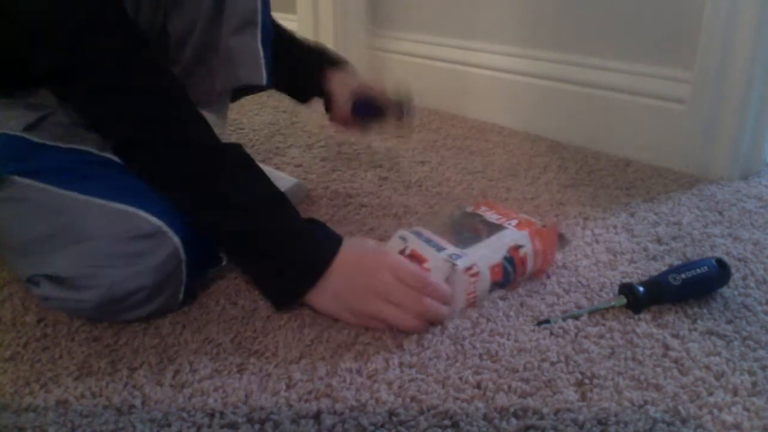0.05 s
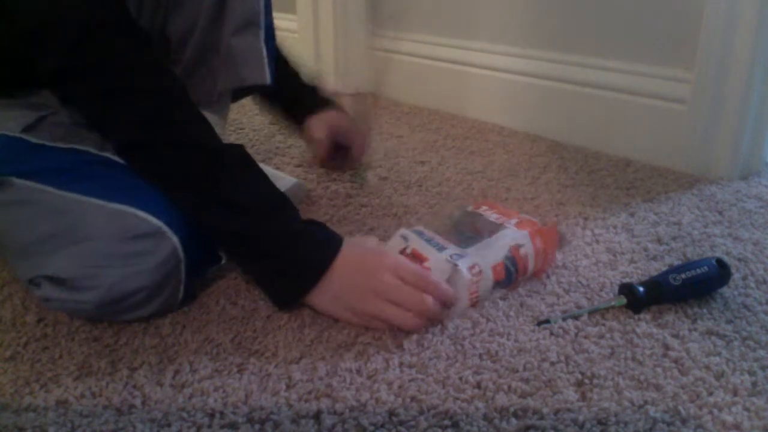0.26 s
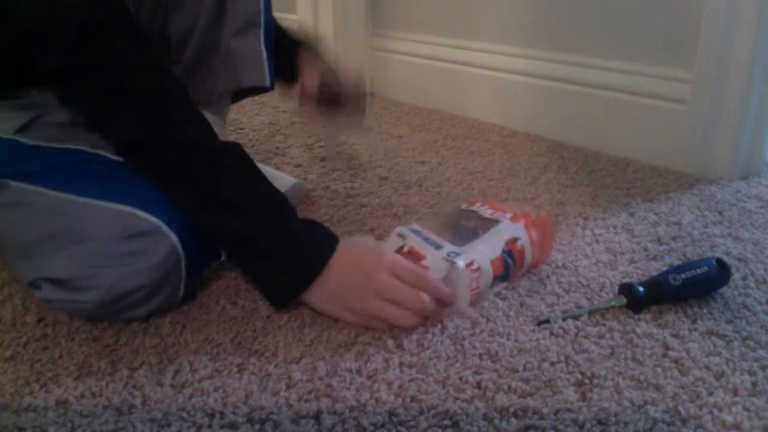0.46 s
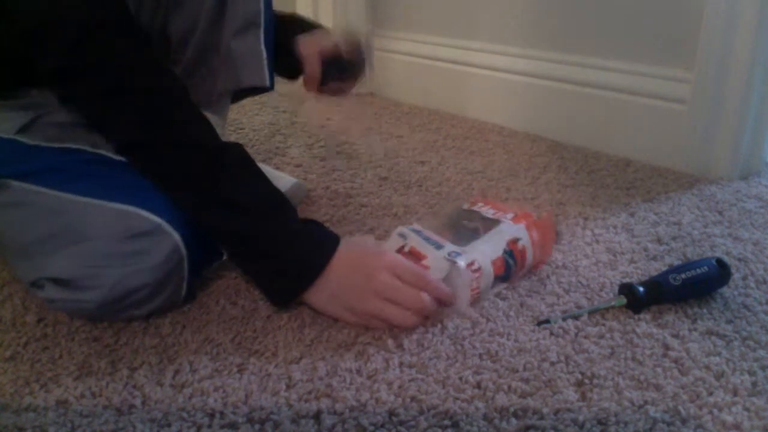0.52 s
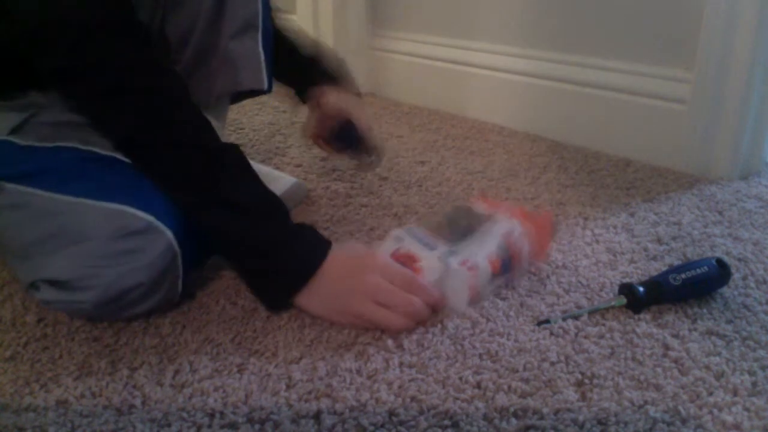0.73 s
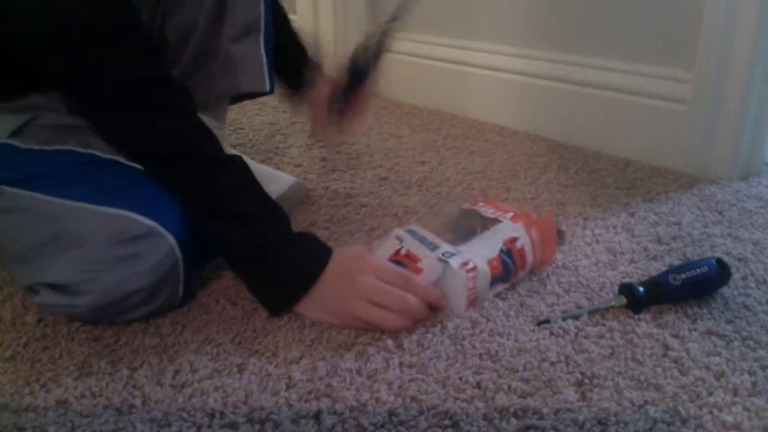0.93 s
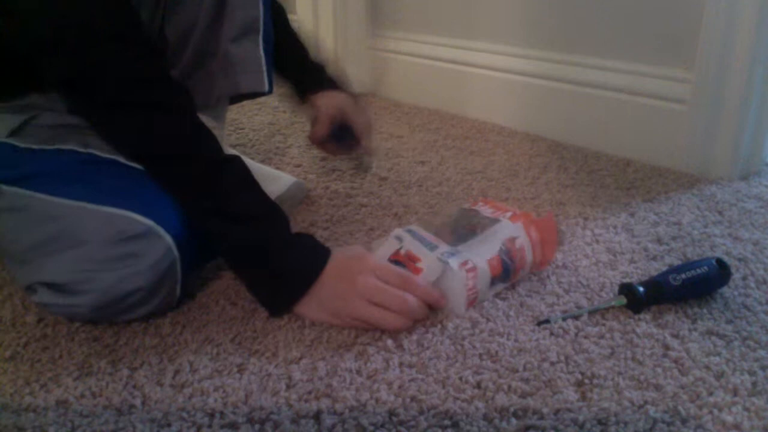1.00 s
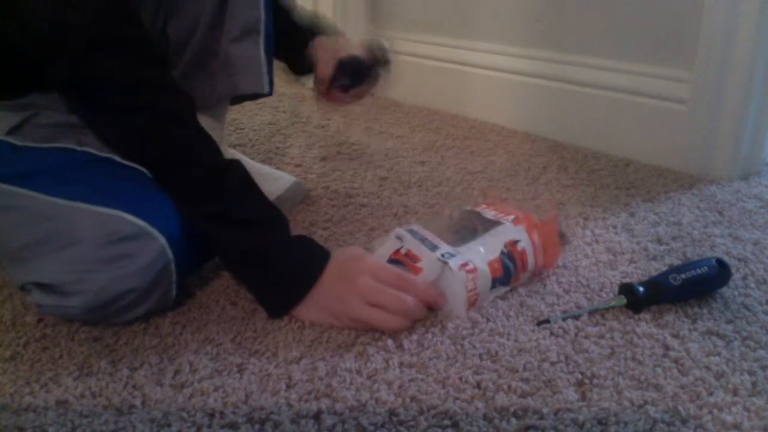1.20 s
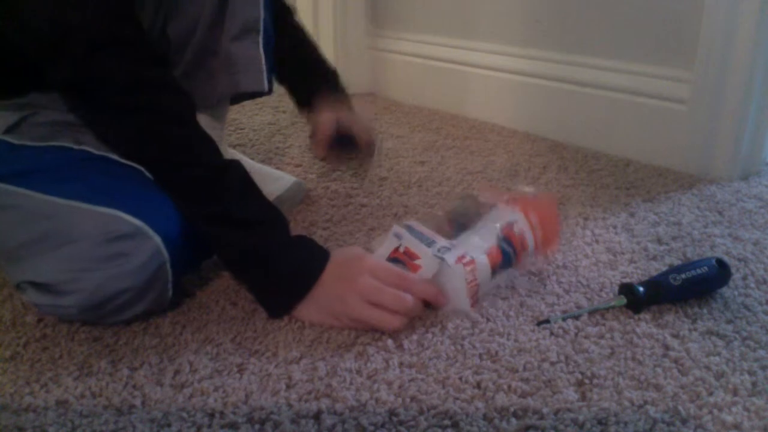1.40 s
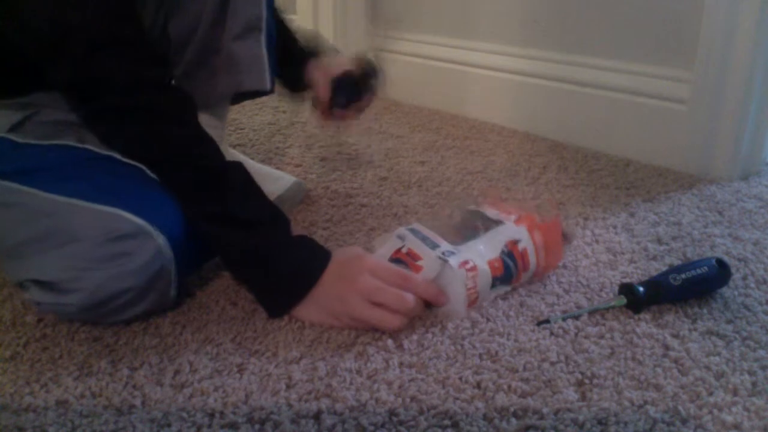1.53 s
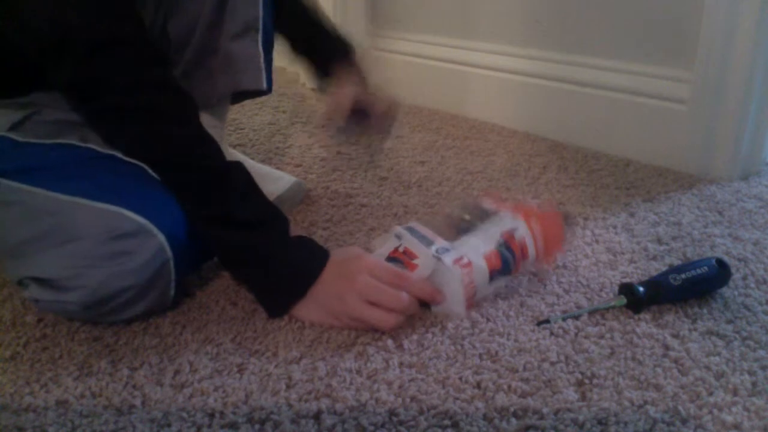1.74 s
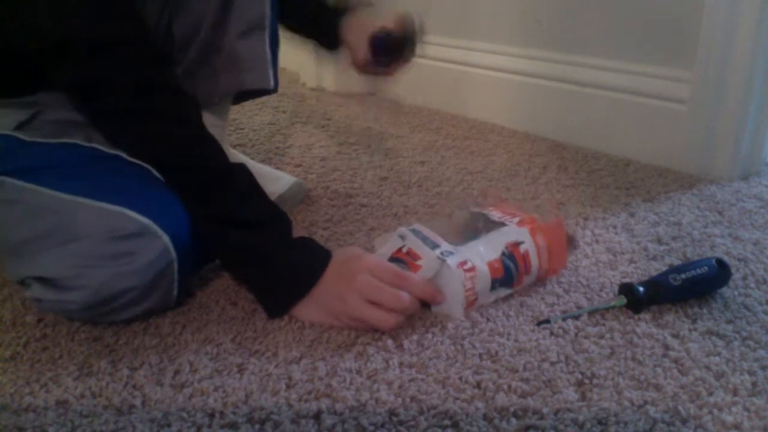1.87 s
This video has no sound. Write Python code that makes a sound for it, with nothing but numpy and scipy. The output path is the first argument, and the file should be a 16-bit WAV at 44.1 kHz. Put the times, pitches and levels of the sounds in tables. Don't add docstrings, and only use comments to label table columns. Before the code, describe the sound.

Five loud hollow whacks on a small windowed box, plastic crackling and popping back between blows

```python
import sys
import numpy as np
from scipy import signal
from scipy.io import wavfile
from scipy.ndimage import uniform_filter1d

SR = 44100
rng = np.random.default_rng(int(sys.argv[2]) if len(sys.argv) > 2 else 0)


def amplitude_ratio(level_db):
    exponent = np.asarray(level_db, float) / 20
    return 10 ** exponent


def store_pcm(level_fs):
    pcm = np.round(np.clip(level_fs, -1, 1) * 32767).astype(np.int16)
    wavfile.write(sys.argv[1], SR, np.atleast_2d(pcm).T)


N = 85995

# [f/Hz, level/dB per Hz]
AIR_COLOUR = [(25, -9), (65, 1), (130, -7), (320, -12), (420, -31.5), (1400, -8), (2600, -24.5),
              (15000, -42)]
# [f/Hz, level/dB]
BLOW_TAIL_COLOUR = [(200, -11.5), (330, -18.5), (650, -23.5), (1200, -9), (2000, -9), (2700, -18.5),
                    (5000, -16), (15000, -33)]
# [f/Hz, level/dB]
POP_TAIL_COLOUR = [(200, -19), (700, -42), (1700, -8.5), (2500, -16), (4600, -12), (7800, -15), (9500, -67),
                   (15000, -44)]
# [f/Hz, t60/s]
TAIL_T60 = [(150, 0.26), (700, 0.38), (1500, 0.27), (4000, 0.26), (8000, 0.31), (12000, 0.14), (16000, .1)]
# [f/Hz, level/dB]
LATE_COLOUR = [(300, -21.5), (1500, -30), (5000, -26), (9000, -38.5), (12000, -53)]
# [delay t/s, level/dB, smear t/s]
SWELLS = [
    (.0195, 5, .0035),
    (.0370, 2.5, .005),
    (.0530, 1, .005),
]
# [delay t/s, level/dB, smear t/s]
ECHOES = [
    (.0040, -13, .001),
    (.0158, -10, .0008),
]
# [delay t/s, level/dB, f/Hz, length t/s, polarity]
BOOMS = [
    (.0145, -16, 88, .0062, 1),
    (.042, -31, 96, .017, 1),
    (.0895, -34, 80, .006, 1),
    (.129, -34, 78, .0065, -1),
    (.17, -50, 60, .012, 1),
    (.25, -46, 65, .015, 1),
]
# [f/Hz, level/dB, t60/s]
WALL_MODES = [(210, -7, 0.026), (261.4, -4, 0.019), (321.5, -2, 0.02), (566, -11.5, 0.022)]
WALL_TILT = [1, -3, 0.5, 6, -3.5]
# [ratio to ring pitch, level/dB, t60/s]
CAVITY_STRUCK = [(0.618, -27, 0.0056), (0.762, -4.5, 0.039), (.91, 2, 0.014), (0.998, 12.5, 0.024),
                 (1.119, 6, 0.019), (1.3, -11.5, 0.011)]
# [ratio to ring pitch, level/dB, t60/s]
CAVITY_POPPED = [(.7, -9, .025), (.94, 0, .04), (1.06, -1, .04)]
# [f/Hz, level/dB, t60/s]
WINDOW_STRUCK = [(2230, -19.5, 0.015), (2643, -7, 0.0035), (3256, -2.5, 0.0099), (4700, 1, 0.003),
                 (6300, -1, 0.0014), (7430, -0.5, 0.0019), (9200, -6.5, 0.0027), (10920, -11, 0.0043),
                 (13070, -16, 0.001), (14900, -23.5, 0.0059)]
# [f/Hz, level/dB, t60/s]
WINDOW_FREE = [(3150, -10, .005), (3680, -6, .007), (4700, 0, .006), (6100, -2, .005), (7650, -1, .005),
               (10800, -16, .003)]
# [t/s, peak level/dB, cavity f/Hz, crack level/dB]
POPS = [(0.1122, -27, 1737, -26), (0.2184, -42, 1510, -30), (0.5128, -23.5, 1805, -16.5),
        (0.804, -68, 1790, -36), (0.9004, -23, 1736, -20), (1.189, -46, 1820, -39.5),
        (1.2530, -25.5, 1770, -20), (1.5435, -76, 1583, -39.5), (1.5953, -20.5, 1784, -20.5),
        (1.8852, -42, 1720, -39.5), (1.9226, -22.5, 1770, -20.5), (.1240, -31.5, 1705, -46.5),
        (.0760, -51, 1500, -58)]
# [t/s, peak level/dB, cavity f/Hz, crack level/dB]
EARLIER_BLOW = (-0.1, -3.5, 1600, -6.5)
# [t/s, peak level/dB, cavity f/Hz, crack level/dB, wall thud level/dB]
BLOWS = [
    (0.2235, 3.5, 1592, 3.5, -4),
    (0.6108, 3, 1660, 0, -11.5),
    (0.964, 2.5, 1546, -0.5, -9.5),
    (1.306, 5.5, 1639, 0.5, -5),
    (1.6330, 4.5, 1794, -1, -9.5),
]

AIR_DB, AIR_PATCHY_DB = -57.5, 1.5
TAIL_RISE_S, LATE_STRETCH = 0.0039, 3.6
BOOM_FOLLOWS = 0.61
THUMP_LAG_S, THUMP_SOFT_HZ = 0.0021, 370
BLOW_SOFT_HZ, POP_SOFT_HZ = 3100, 3000
POP_THIN_HZ, POP_DULL_HZ = 900, 8500
CHATTER_FADE_S, CHATTER_PEAK_S, CHATTER_WIDTH_S = .006, .0036, .0013
CHATTER_PER_S, CHATTER_SPREAD_DB = 12000, 3.0
RUMBLE_CUT_HZ, MIC_TOP_HZ, OVERLOAD = 48, 14800, 1.15


def at_hz(points, hz):
    points = np.array(points)
    return np.interp(np.log(hz), np.log(points[:, 0]), points[:, 1])


def filtered(x, order, hz, kind="low"):
    return signal.sosfilt(signal.butter(order, hz, kind, fs=SR, output="sos"), x)


def bump(t, centre, width):
    return np.exp(-.5 * ((t - centre) / width) ** 2)


def add(out, s, sound):
    i = int(s * SR)
    out[max(i, 0):i + len(sound)] += sound[max(-i, 0):len(out) - i]


def bands(size):
    edges = 25 * 2 ** np.arange(0, 9.6, 1 / 3)
    white = rng.standard_normal((2, size))
    return [(np.sqrt(lo * hi), filtered(white[k % 2], 2, [lo, hi], "band"))
            for k, (lo, hi) in enumerate(zip(edges, edges[1:]))]


def room_air():
    out = 0
    for hz, noise in bands(N + SR):
        lumps = uniform_filter1d(uniform_filter1d(rng.standard_normal(N), size=2000), size=2000)
        level_db = at_hz(AIR_COLOUR, hz) + AIR_PATCHY_DB * lumps / lumps.std()
        out = out + amplitude_ratio(level_db) * noise[SR:]
    return amplitude_ratio(AIR_DB) * out / out.std()


def corridor_tail(events, colour):
    t, out = np.arange(SR) / SR, np.zeros(N)
    swell_db = sum(db * bump(t, lag, smear) for lag, db, smear in SWELLS)
    swell = (1 - np.exp(-(t / TAIL_RISE_S) ** 2)) * amplitude_ratio(swell_db)
    for hz, noise in bands(N):
        t60, power = at_hz(TAIL_T60, hz), np.zeros(N)
        early = amplitude_ratio(-60 * t / t60)
        late = amplitude_ratio(at_hz(LATE_COLOUR, hz) - 60 * t / (t60 * LATE_STRETCH))
        fall = swell * (early + late)
        for s, peak_db, _, crack_db, *_ in events:
            level_db = .5 * (peak_db + crack_db) + at_hz(colour, hz)
            add(power, s, (amplitude_ratio(level_db) * fall) ** 2)
        out += np.sqrt(power) * noise
    return out


def near_reflections(x):
    t = np.arange(SR // 20) / SR
    response = (t == 0) * 1.
    for lag, db, smear in ECHOES:
        puff = rng.standard_normal(len(t)) * bump(t, lag, smear) * (t > .001)
        response += amplitude_ratio(db) * puff / np.sqrt(np.sum(puff ** 2))
    return signal.fftconvolve(x, response)[:N]


def floor_boom():
    t, out = np.arange(SR // 2) / SR, np.zeros(N)
    boom = sum(sign * amplitude_ratio(db) * np.cos(2 * np.pi * hz * (t - lag)) * bump(t, lag, length)
               for lag, db, hz, length, sign in BOOMS)
    boom = boom * np.minimum(t / .004, 1)
    for s, _, _, _, thud_db in BLOWS:
        add(out, s, amplitude_ratio(BOOM_FOLLOWS * (thud_db + 5)) * boom)
    return out


def ring(clicks, hz, t60):
    r, w = amplitude_ratio(-60 / (max(t60, .002) * SR)), 2 * np.pi * hz / SR
    return signal.lfilter([0, np.sin(w)], [1, -2 * r * np.cos(w), r * r], clicks + 1e-18)


def strike(modes, clicks, spread_db, turn=-1):
    luck = rng.standard_normal((16, 2))
    sound = 0
    for k, ((hz, db, t60), (a, b)) in enumerate(zip(modes, luck)):
        sound = sound + amplitude_ratio(db + spread_db * a) * ring(clicks, hz * (1 + 0.015 * b), t60) * turn ** k
    return sound / np.abs(sound).max()


def contact(soft_hz):
    click = np.zeros(SR // 8)
    click[0] = -1
    return filtered(click + 1e-18, 2, soft_hz)


def chatter():
    t = np.arange(SR // 8) / SR
    when, size, side = rng.random((3, len(t)))
    swell = .3 * np.exp(-(t / CHATTER_FADE_S) ** 2) + bump(t, CHATTER_PEAK_S, CHATTER_WIDTH_S)
    height = amplitude_ratio(-CHATTER_SPREAD_DB * np.log(size + .03))
    return (when < CHATTER_PER_S / SR) * height * np.sign(side - .5) * swell


def cavity(modes, ring_hz):
    return [(ratio * ring_hz, db, t60) for ratio, db, t60 in modes]


def window_pops():
    out = np.zeros(N)
    for s, db, hz, crack_db in POPS:
        crackle = chatter()
        push = contact(POP_SOFT_HZ) + .05 * crackle / np.abs(crackle).max()
        add(out, s, amplitude_ratio(db) * strike(cavity(CAVITY_POPPED, hz), push, spread_db=1))
        add(out, s, amplitude_ratio(crack_db) * strike(WINDOW_FREE, crackle, spread_db=5.5))
    return filtered(out, 2, [POP_THIN_HZ, POP_DULL_HZ], "band")


def shaft_blows():
    out = np.zeros(N)
    for (s, db, hz, crack_db, thud_db), tilt_db in zip(BLOWS, WALL_TILT):
        walls = [(f, d + tilt_db * k, t60) for k, (f, d, t60) in enumerate(WALL_MODES)]
        ringing = strike(cavity(CAVITY_STRUCK, hz), contact(BLOW_SOFT_HZ), spread_db=3, turn=1)
        crack = strike(WINDOW_STRUCK, chatter(), spread_db=2.5)
        thud = strike(walls, contact(THUMP_SOFT_HZ), spread_db=5.5)
        add(out, s, amplitude_ratio(db) * ringing)
        add(out, s, amplitude_ratio(crack_db) * crack)
        add(out, s + THUMP_LAG_S, amplitude_ratio(thud_db) * thud)
    return out


def scene():
    tails = corridor_tail([EARLIER_BLOW, *BLOWS], BLOW_TAIL_COLOUR) + corridor_tail(POPS, POP_TAIL_COLOUR)
    box = near_reflections(window_pops() + shaft_blows())
    return (room_air() + tails + floor_boom() + box)[None, :]


def band_limit(x):
    return signal.sosfilt(signal.butter(12, 15670, fs=SR, output="sos"), x)


def record(dry):
    x = filtered(dry, 2, RUMBLE_CUT_HZ, "high")
    x = filtered(x, 4, MIC_TOP_HZ)
    x = x / (1 + np.abs(x / OVERLOAD) ** 4) ** .25
    return band_limit(x)


dry = scene()
out = record(dry)
store_pcm(out)
```